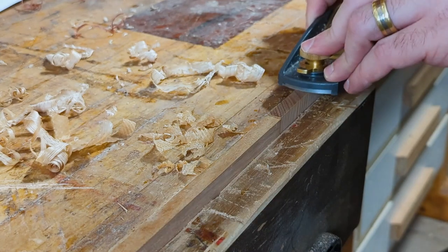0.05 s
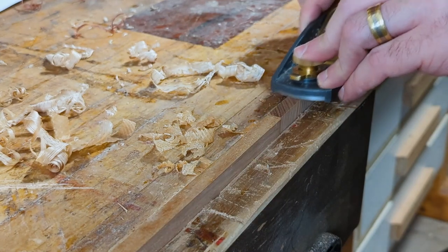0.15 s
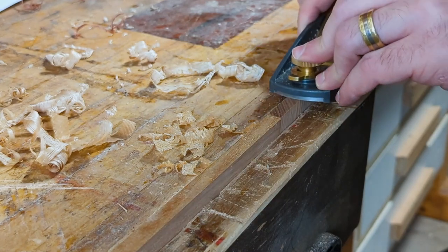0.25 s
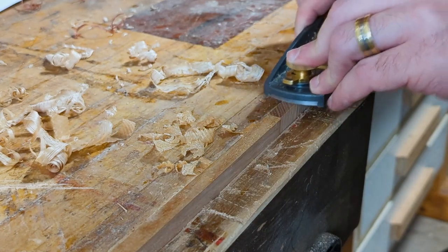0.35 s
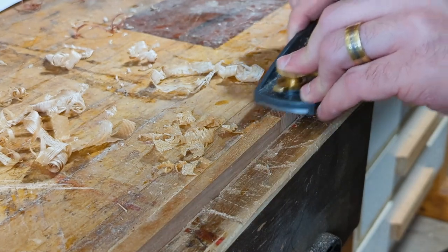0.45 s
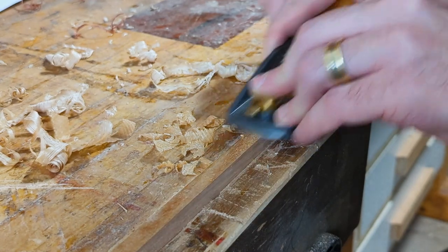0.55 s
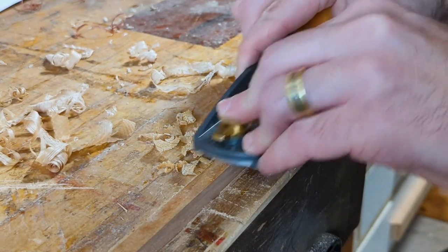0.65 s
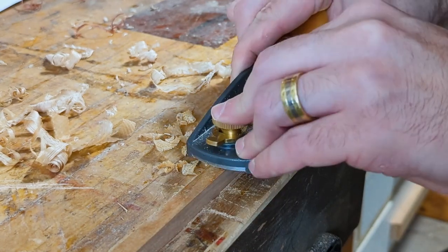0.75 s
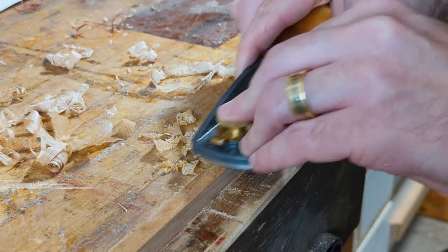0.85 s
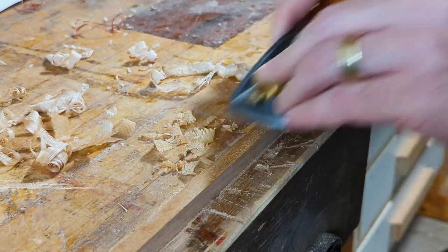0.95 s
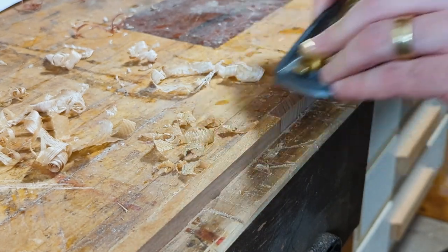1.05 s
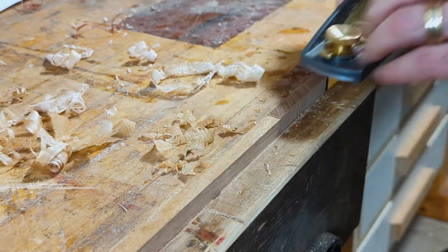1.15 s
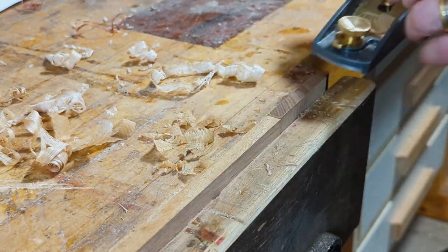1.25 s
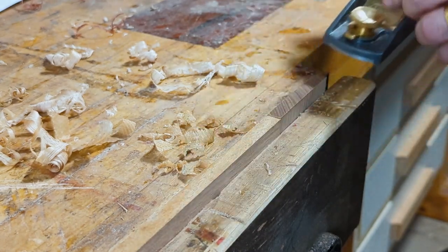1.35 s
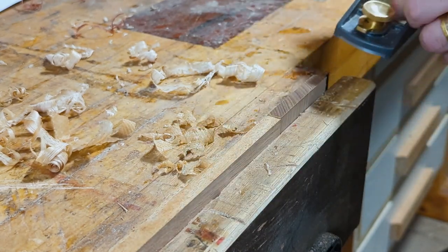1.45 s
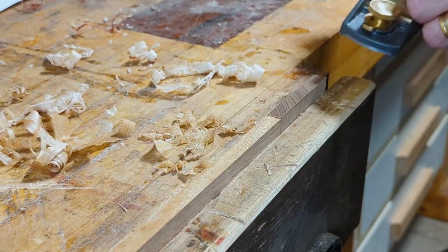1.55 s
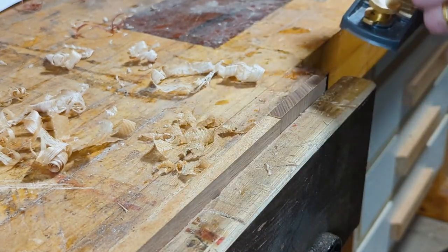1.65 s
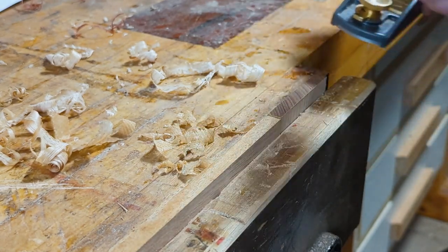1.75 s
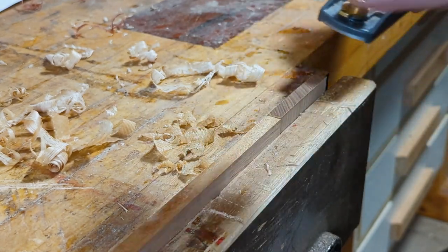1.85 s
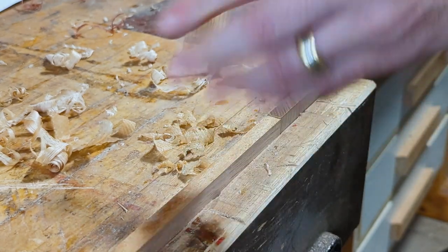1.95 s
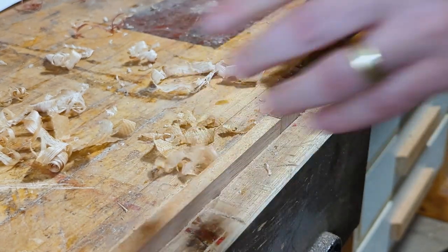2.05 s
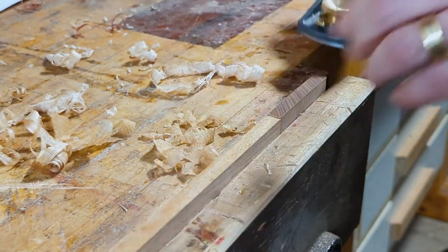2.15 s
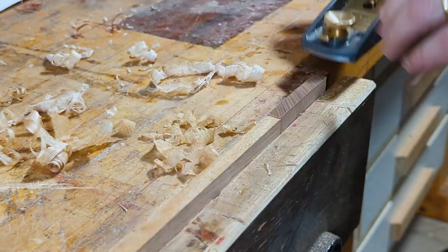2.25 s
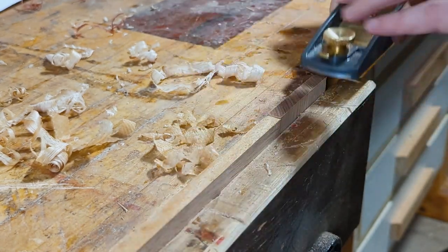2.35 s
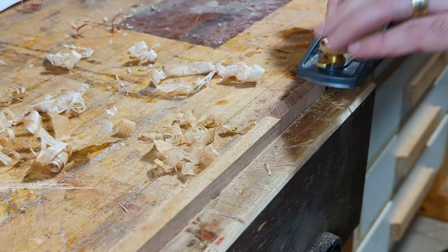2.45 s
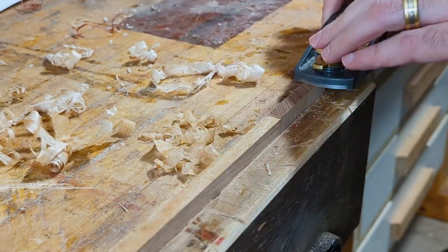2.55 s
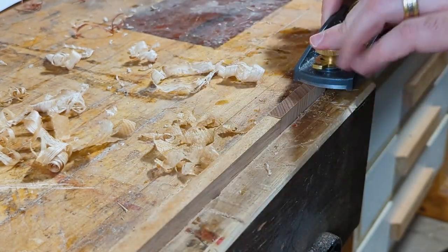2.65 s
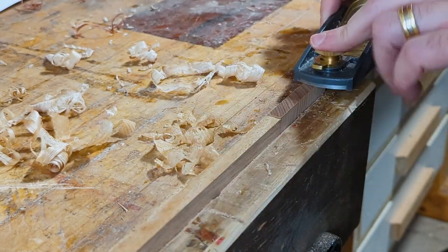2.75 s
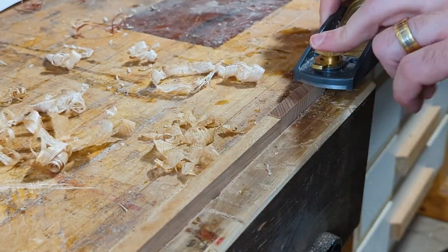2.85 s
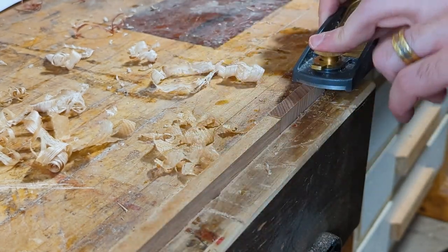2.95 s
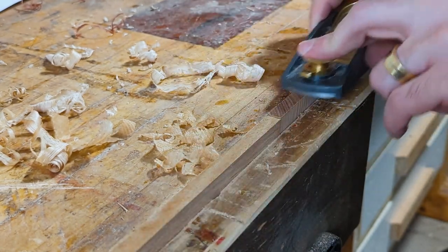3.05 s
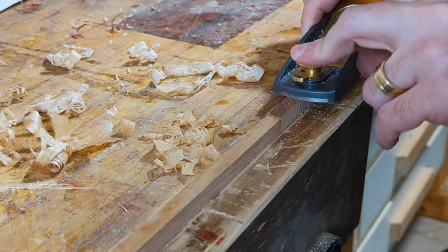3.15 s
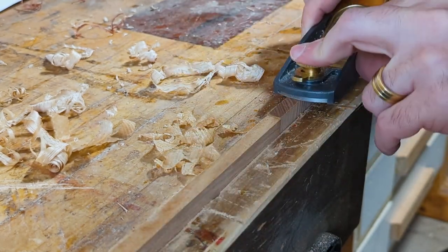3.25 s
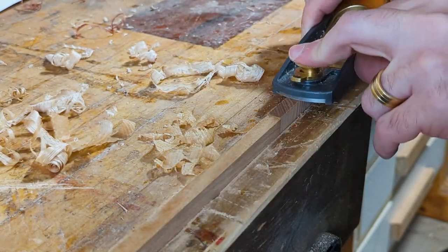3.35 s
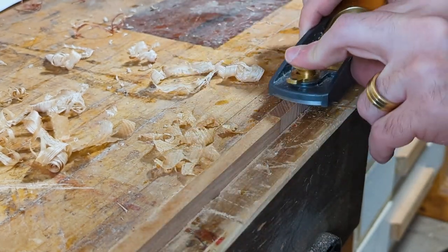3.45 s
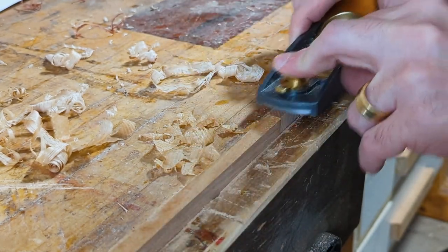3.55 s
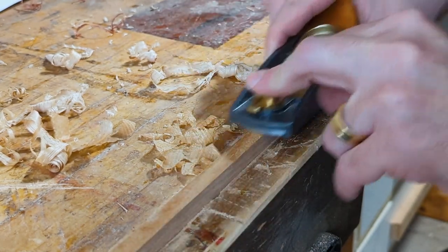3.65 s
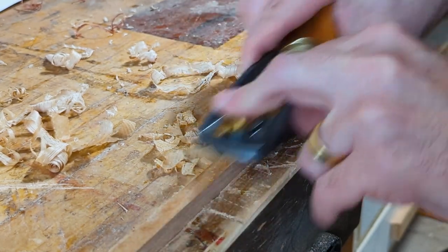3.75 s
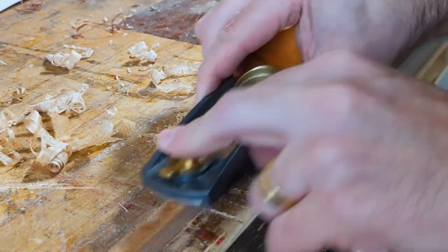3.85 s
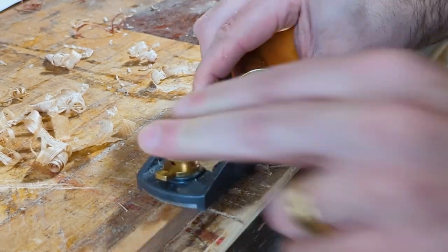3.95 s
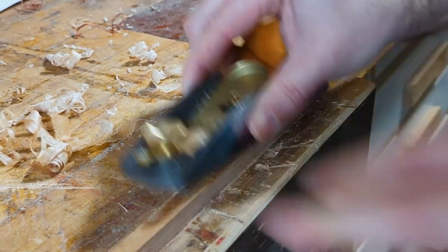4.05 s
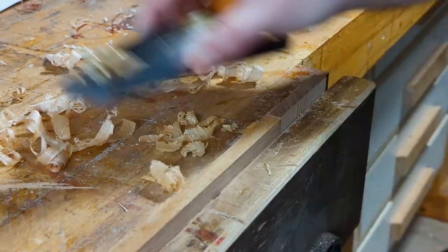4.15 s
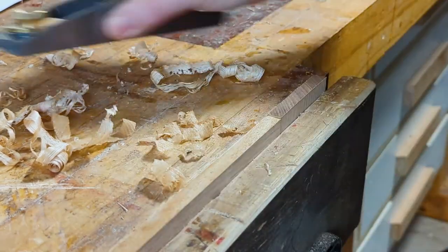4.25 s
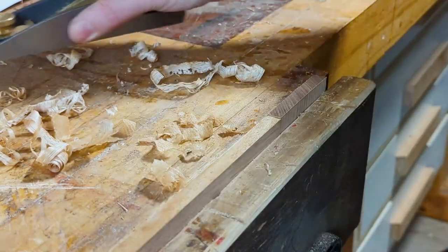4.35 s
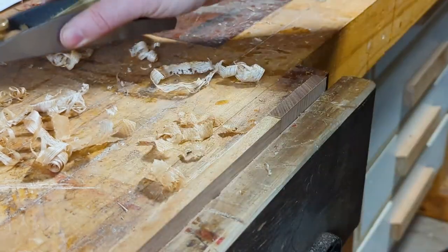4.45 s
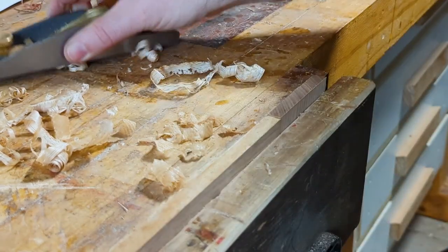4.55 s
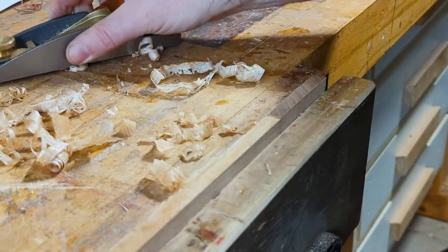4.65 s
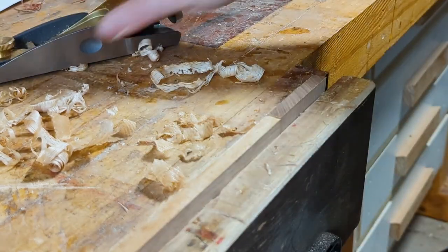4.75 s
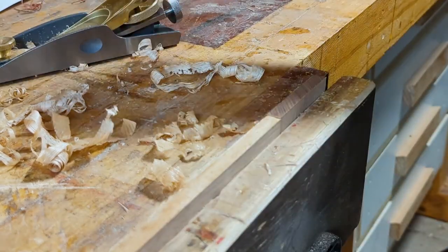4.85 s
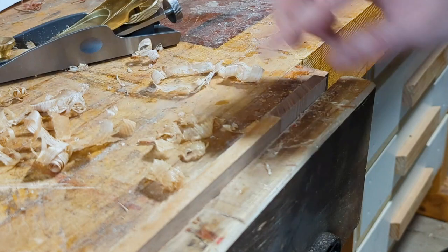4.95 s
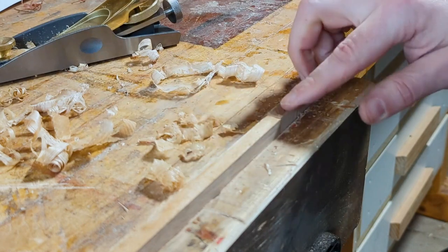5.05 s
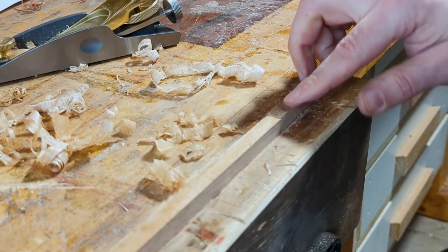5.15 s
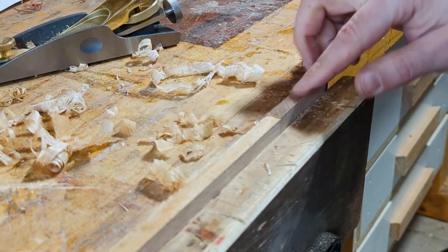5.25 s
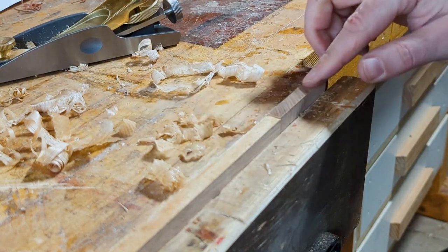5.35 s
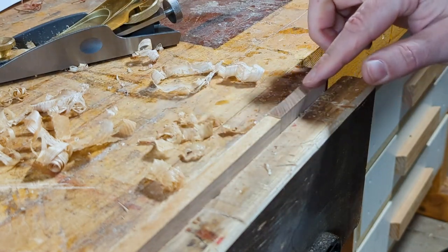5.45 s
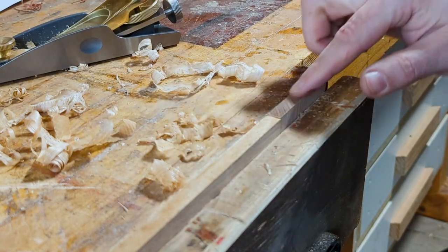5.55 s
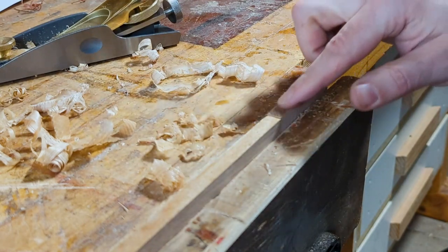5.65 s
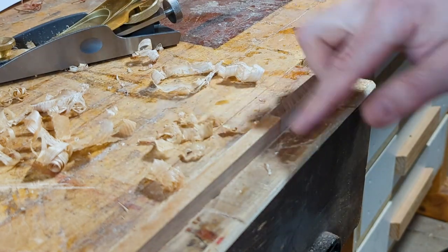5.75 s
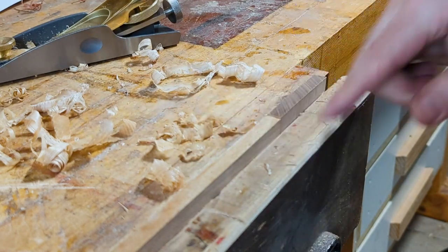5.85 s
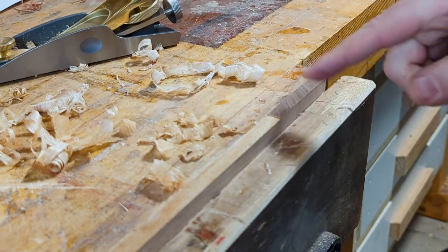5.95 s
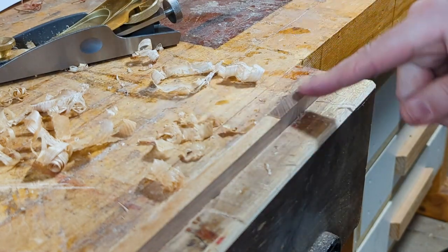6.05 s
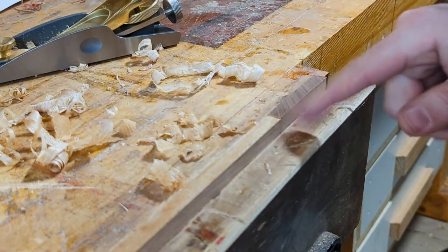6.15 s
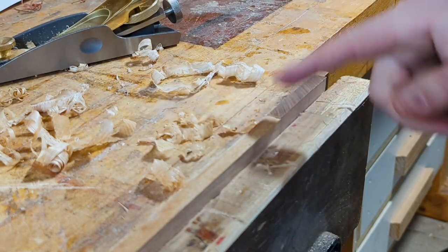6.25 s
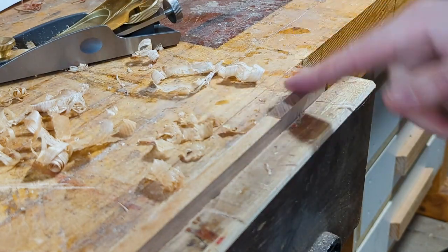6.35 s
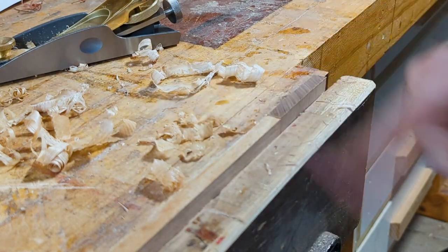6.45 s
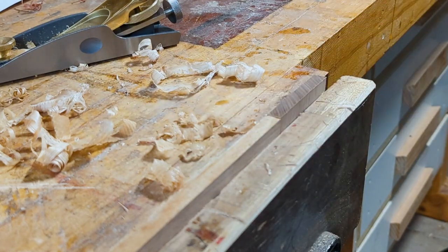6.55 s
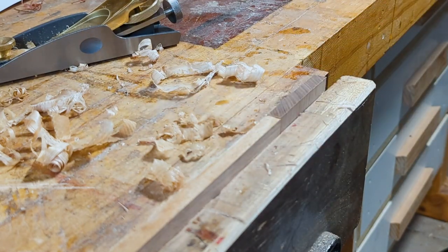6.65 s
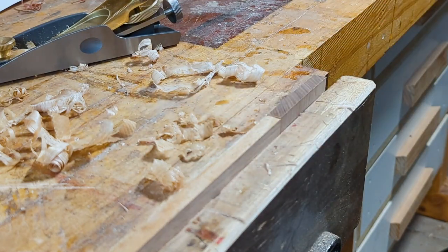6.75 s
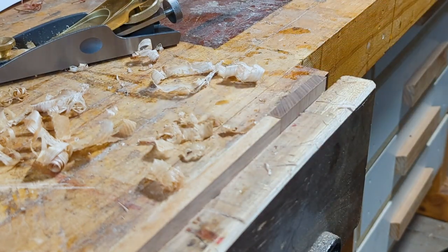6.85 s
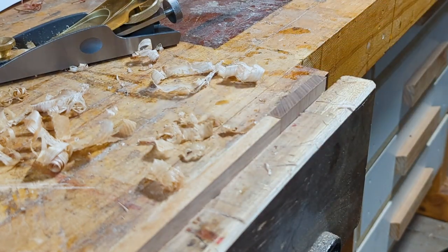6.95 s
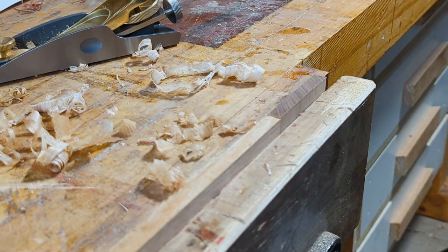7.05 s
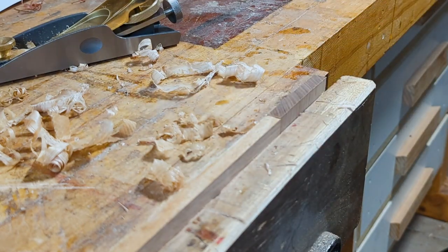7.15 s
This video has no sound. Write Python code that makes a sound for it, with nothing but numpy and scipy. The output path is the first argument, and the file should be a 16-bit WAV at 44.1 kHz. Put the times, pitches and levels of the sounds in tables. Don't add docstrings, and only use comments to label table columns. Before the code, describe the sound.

A hand plane shrieks and scrapes twice over clamped wood, with a soft thud between, then bench knocks and light finger rubbing.

```python
import sys
import numpy as np
from scipy import signal
from scipy.fft import rfft, irfft, next_fast_len
from scipy.io import wavfile
from scipy.ndimage import uniform_filter1d, map_coordinates

SR = 44100
rng = np.random.default_rng(int(sys.argv[2]) if len(sys.argv) > 2 else 0)


def dump(signal):
    limited = np.clip(np.atleast_2d(signal).T, -1, 1)
    pcm = np.round(limited * 32767).astype(np.int16)
    wavfile.write(sys.argv[1], SR, pcm)


def gain_from_db(level_db):
    decades = np.asarray(level_db, float) / 20
    return 10 ** decades


N = 318005
SWELL_DB = 21.5

LOW_GRABS = [(.345, 0.051, 0.018, -12.5), (.374, .013, 0.0081, -16), (.391, 0.0085, 0.011, -14.5),
             (.417, 0.024, 0.019, -17), (.445, .015, 0.018, -29.5)]
GLIDE_GRABS = [(.475, .015, 0.0057, -20.5), (.494, 0.016, 0.01587, -18), (.522, 0.019, 0.021, -21),
               (.546, .012, 0.011, -27.5), (.585, 0.02, 0.028, -27.5)]
HIGH_GRABS = [(.555, 0.033, 0.029, -26), (.59, 0.015, 0.0079, -20.5), (.613, 0.015, .022, -15),
              (.652, 0.034, 0.027, -27), (.72, 0.021, 0.0085, -26.5), (.78, 0.043, 0.05, -31),
              (.84, .04, .035, -38)]
START_GRABS = [(3.097, .01, .005, -19), (3.1015, .006, .008, -5.5), (3.119, .009, 0.0082, -10),
               (3.131, .009, 0.0089, -13), (3.146, .008, 0.0079, -14.5), (3.165, .012, 0.0066, -20),
               (3.181, .011, 0.021, -16), (3.226, .024, 0.016, -19), (3.252, .011, 0.008, -19),
               (3.279, .016, 0.0078, -21.5), (3.303, .013, 0.0052, -19), (3.345, .035, 0.0097, -25.5),
               (3.44, .05, 0.04, -39)]
LAST_GRABS = [(3.598, .022, .01, -9.5), (3.617, .015, .017, -13.5), (3.644, .017, .014, -13),
              (3.66, .01, .011, -15), (3.685, .017, .019, -16), (3.716, .019, .017, -19),
              (3.748, .024, .022, -19), (3.785, .016, .016, -20), (3.82, .016, .016, -30),
              (3.85, .02, .018, -26), (3.88, .014, .02, -27), (3.925, .03, .022, -29)]
# time in seconds, level in dB.
SIDE_LEVEL = [(.63, -37), (0.654, -26.5), (.685, -42), (.71, -29), (.74, -38.5), (.78, -31.5), (.83, -36.5),
              (.868, -41), (.88, -48), (.97, -60)]
# time in seconds, pitch in Hz.
LOW_PITCH = [(0.294, 1880), (0.321, 1818), (0.358, 1827), (.4, 1850), (.45, 1847)]
GLIDE_PITCH = [(.46, 1860), (0.478, 1965), (0.493, 2070), (0.504, 2050), (0.506, 2302), (0.516, 2300),
               (0.518, 2500), (.59, 2510), (.62, 2586)]
HIGH_PITCH = [(0.532, 2715), (0.588, 2800), (.61, 2785), (.9, 2775)]
SIDE_PITCH = [(0.629, 2650), (.95, 2635)]
START_PITCH = [(3.088, 2300), (3.097, 2210), (3.106, 2170), (3.4, 2172), (3.5, 2250)]
LAST_PITCH = [(3.574, 2432), (3.596, 2349), (3.605, 2237), (3.96, 2220)]
# start in seconds, end in seconds, pitch in Hz, first and last level in dB.
SQUEAKS = [(6.201, 6.253, 2234, -72, -58), (6.25, 6.406, 2244, -60, -66), (6.489, 6.65, 2314, -62.5, -66),
           (6.723, 6.85, 2300, -69, -63.5)]
# multiple of the pitch, level in dB.
BRIGHT_OVERTONES = [(2, -15), (3, -20), (4, -25.5), (5, -32), (6, -37), (7, -36.5)]
DULL_OVERTONES = [(2, -15), (3, -24), (4, -31), (5, -42)]


def blade():
    both = np.zeros((2, N))
    squeal(both, LOW_PITCH, grabs(LOW_GRABS), -3, 0.0015, 0.66, settle_s=0.016, dulls_db_s=40)
    squeal(both, GLIDE_PITCH, grabs(GLIDE_GRABS), -29, 0.0042, 1.11)
    squeal(both, HIGH_PITCH, grabs(HIGH_GRABS), -32, 0.0029, 1.46)
    squeal(both, SIDE_PITCH, SIDE_LEVEL, -26, 0.0048, 1.2)
    squeal(both, START_PITCH, grabs(START_GRABS), 3.5, 0.0012, 0.5, settle_s=0.006, half_db=-44,
           overtones=BRIGHT_OVERTONES, dulls_db_s=5.5)
    squeal(both, LAST_PITCH, grabs(LAST_GRABS), -2, 0.0035, 0.5, settle_s=0.0193,
           overtones=DULL_OVERTONES, dulls_db_s=8)
    for s, end, hz, first_db, last_db in SQUEAKS:
        squeal(both, [(s, hz)], [(s, first_db), (end, last_db)], -30, 0.012, 4.5)
    shared, opposed = both
    return heard(shared, -17, lag=0, pan_db=-1) + opposed * [[1], [-1]]


# multiple of the pitch, level in dB.
OVERTONES = [(1, 10), (2, -14.5), (3, -23), (4, -24.5), (5, -29), (6, -40), (7, -40.5)]
HALF_ORDERS = [1.5, 2.5, 3.5]


def squeal(out, pitch, loudness, bite_db, jitter, flutter_db, settle_s=0., half_db=None,
           overtones=OVERTONES[1:], dulls_db_s=0.):
    s, db = np.vstack(loudness).T
    t = np.arange(s[0], s[-1], 1 / SR)

    def chance(rate):
        return wobble(rate, len(t))

    level_db = uniform_filter1d(np.interp(t, s, db), SR // 300)
    hz = np.interp(t, *np.transpose(pitch)) * (1 + jitter * chance(90))
    turn = 2 * np.pi * np.cumsum(hz) / SR
    slow_db = uniform_filter1d(level_db, SR // 40)
    fading_db = 0.2 * (slow_db - slow_db.max())
    bitten_db = slow_db + bite_db - dulls_db_s * (t - s[0])
    orders = list(overtones)
    if half_db:
        orders += [(order, half_db) for order in HALF_ORDERS]

    over = np.zeros(len(t), complex)
    for order, order_db in orders:
        if order * pitch[0][1] < 16700:
            line_db = bitten_db + order_db + order * fading_db + 2.5 * chance(70)
            over += gain_from_db(line_db) * np.exp(1j * (order * turn + 0.8 * chance(150)))
    over *= np.clip((t - s[0] - settle_s) / 0.0039, 0, 1)

    shared = gain_from_db(level_db + flutter_db * chance(60)) * np.sin(turn) + over.imag
    drift = 0.7 * chance(25)
    in_step = (0.3 * chance(35) - 0.1) * np.sin(turn)
    out_of_step = (0.75 + 0.25 * chance(35)) * np.cos(turn + drift)
    opposed = gain_from_db(0.6 * level_db + 0.4 * slow_db) * (in_step + out_of_step)
    opposed += 1.1 * (over * np.exp(1j * drift)).real + 0.15 * over.imag
    edge = np.clip(np.minimum(t - s[0], s[-1] - t) / 0.0031, 0, 1)
    add(out, edge * gain_from_db(1) * np.array([shared, opposed]), s[0])


def grabs(rows):
    s, rise, fall, db = np.transpose(rows)[..., None]
    t = np.arange((s - rise).min(), (s + fall).max(), 0.001)
    phase = np.clip(np.where(t < s, (s - t) / rise, (t - s) / fall), 0, 1)
    power = (gain_from_db(db) * np.cos(np.pi / 2 * phase)) ** 2
    between = gain_from_db(db.max() - 30)
    return np.c_[t, 10 * np.log10(power.sum(0) + between ** 2)]


# centre in Hz, width in Hz, level in dB.
BENCH = [(363, 46, 5), (595, 130, -1), (820, 210, -5.5), (1250, 840, -10.5)]
IRON = [(1454, 57, -14), (1847, 75, -2.5), (1977, 60, -4.5), (2300, 92, -2.5), (2510, 47, -1),
        (2743, 74, -1.5), (3320, 540, -21), (3970, 190, -19.5)]
BOARD = [(1480, 340, -1), (2050, 820, -4), (2650, 190, 3), (3340, 560, -9), (4170, 1800, -14)]
# frequency in Hz, level in dB per Hz.
RASP = [(1880, -34.5), (3200, -3), (3480, -8), (3770, -4.5), (4530, -12), (8820, -5), (10500, -12.5),
        (13600, -35.5), (22000, -120)]
SIZZLE = [(6000, -31), (9500, 1), (11500, -3.5), (14000, -5), (15800, -6)]
CRISP = [(5000, -10), (8000, -9), (10500, -1), (12500, -0.5), (14500, -2.5), (15800, -3.5)]


def rubbing():
    drone_db, ring_db, rasp_db, sizzle_db = contact_levels()
    drone = gain_from_db(drone_db - 4.5) * unit(filtered(grit(2, 4.5, 0.7), body(BENCH)))

    shake = grit(4, 2.5, 0.8)
    put_away = round(4.95 * SR)
    iron = unit(filtered(shake[:, :put_away], body(IRON)))
    board = unit(filtered(shake[:, put_away:], body(BOARD)))
    ring = gain_from_db(ring_db) * np.hstack([iron, board])

    ripple_db = 2.6 * rng.standard_normal(200)
    fibres = filtered(grit(5, 1.3, 0.8), lambda hz: gain_from_db(np.interp(hz / 130, np.arange(200), ripple_db)))
    fibres = patchy(fibres, depth_db=4)
    laid_down = round(4.4 * SR)
    sizzle = np.hstack([coloured(fibres[:, :laid_down], SIZZLE), coloured(fibres[:, laid_down:], CRISP)])
    hiss = gain_from_db(rasp_db + 6) * coloured(fibres, RASP) + gain_from_db(sizzle_db + 2) * sizzle
    return heard(drone + ring, -5.5, lag=9, pan_db=-1) + heard(hiss, -6.5, lag=7, pan_db=3)


# peak in seconds, rise in seconds, fall in seconds, ring level in dB, hiss over ring in dB.
FIRST_STROKE = [(.185, 0.14, .02, -42.5, -13), (.2, 0.0023, 0.066, -33, -26.5),
                (.336, 0.036, 0.58, -50.5, 2.5), (.52, 0.19, 0.14, -26, -19), (.6, .1, 0.15, -44, -2),
                (.7, .1, 0.12, -55, -3.5), (.875, .01, .06, -49, -11.5), (1.93, 0.011, .012, -81, 3.5)]
SECOND_STROKE = [(3.01, .03, .25, -43.5, -20), (3.07, .09, 0.09, -40, -15), (3.128, .012, 0.05, -35, -10),
                 (3.16, .03, .2, -44, -16), (3.385, .005, .08, -55, -24), (3.432, 0.0074, 0.29, -29, -19.5),
                 (3.555, 0.14, .09, -25.5, -15.5), (3.751, 0.36, .2, -36, -9.5),
                 (3.91, .5, 0.044, -51.5, -12), (4.016, 0.0051, .04, -50, -13),
                 (4.072, 0.0054, 0.15, -48.5, -50)]
SHAVINGS = [(4.582, 0.035, 0.13, -56.5, 2), (4.685, .005, 0.11, -61, 1.5), (4.746, 0.08, 0.013, -53.5, -6),
            (4.807, 0.0035, 0.058, -49, -14.5)]
FINGERS = [(5.18, 0.053, 0.37, -59, -38), (5.32, 0.18, 0.062, -49, -15.5), (5.635, 0.035, 0.044, -64, -9),
           (5.68, 0.82, 0.14, -59, -25), (5.77, 0.088, .02, -54.5, -7.5), (6.155, 0.11, 0.079, -54.5, -19),
           (6.3, 0.48, 2.2, -64, -25.5), (6.435, 0.029, 0.11, -45.5, -10.5),
           (6.47, 0.066, .07, -46.5, -13.5), (6.96, 0.2, 0.118, -56.5, -36),
           (7.12, 0.076, 1.53, -54.5, -19)]
SIZZLE_OVER_RASP = [4, -1.5, 5.5, 1]
# peak in seconds, rise in seconds, fall in seconds, drone level in dB.
SHUDDERS = [(.12, .9, .3, -61), (.213, 0.019, 0.07, -27.5), (.53, 0.14, 0.25, -27),
            (.884, 0.0293, 0.044, -31), (3.058, 0.12, 0.035, -50), (3.135, 0.042, 0.48, -44),
            (3.385, 0.0034, 0.044, -45), (3.555, 0.17, 0.17, -32), (3.694, 0.086, 0.1, -25.5),
            (3.76, 0.027, 0.2, -33), (4.016, 0.0062, 0.05, -42), (4.07, 0.04, 0.5, -60),
            (5.12, 0.14, .1, -62), (5.32, 0.14, 0.16, -43.5), (5.65, .9, 0.51, -62),
            (6.47, 0.053, 0.089, -41), (6.96, 0.26, 0.19, -57), (7.15, 0.25, 0.75, -58)]


def contact_levels():
    kinds = [FIRST_STROKE, SECOND_STROKE, SHAVINGS, FINGERS]
    scrapes = np.vstack(kinds)
    tilt_db = np.repeat(SIZZLE_OVER_RASP, [len(kind) for kind in kinds])

    def hiss(over_db, quiet_db):
        rows = np.c_[scrapes[:, :3], scrapes[:, 3] + scrapes[:, 4] + over_db]
        return swells(rows, quiet_db, rises=1.2, falls=1.4, lets_go=1.64)

    drone_db = swells(SHUDDERS, -75.5)
    ring_db = swells(scrapes[:, :4], -81.5)
    return drone_db, ring_db, hiss(-tilt_db / 2, -104), hiss(tilt_db / 2, -106)


def grit(spread_db, clump_db, apart):
    noise = rng.standard_normal(N) + apart * rng.standard_normal((2, N))
    return noise * gain_from_db(spread_db * rng.standard_normal(N) + clump_db * wobble(180))


def patchy(x, depth_db):
    z = signal.stft(x, nperseg=512)[2]
    field = uniform_filter1d(rng.standard_normal(z.shape[1:]), size=5, axis=0)
    field = uniform_filter1d(field, size=9, axis=1)
    return signal.istft(z * gain_from_db(depth_db * unit(field)), nperseg=512)[1][:, :N]


# peak in seconds, rise in seconds, fall in seconds, pitch in Hz, level in dB.
HUMS = [(.12, .09, 0.09, 2750, -44), (.118, .008, .08, 2240, -47), (.185, .09, 0.027, 2720, -35.5),
        (0.874, 0.0073, 0.025, 10000, -46), (.78, 0.097, 0.13, 2720, -41), (0.179, .07, .08, 9700, -56),
        (.49, .1, .06, 9450, -49), (0.886, .012, 0.077, 1680, -44), (0.899, .02, 0.054, 3340, -61),
        (2.99, .03, 0.084, 2240, -47), (3.019, .06, 0.21, 1350, -48.5), (3.04, .09, 0.072, 2600, -45),
        (3.16, .04, 0.19, 1080, -50), (3.394, .012, .06, 1800, -36), (3.53, .12, .1, 8800, -48.5),
        (3.55, .1, .05, 2700, -26.5), (3.65, .06, 0.082, 1840, -40), (3.99, .03, 0.27, 2230, -49),
        (4.07, .03, 0.087, 750, -47.5), (4.695, .012, .03, 12200, -54.5), (5.221, .06, 0.29, 2650, -55.5),
        (5.833, 0.0032, 0.045, 1250, -61), (6.269, .03, 0.066, 2710, -57.5), (3.17, .05, .2, 350, -44),
        (3.71, .1, .2, 355, -34), (3.5, .1, .12, 2760, -33), (6.3, .15, .2, 380, -58),
        (6.45, .03, .06, 10000, -54)]


def hums():
    out = np.zeros((2, N))
    for s, rise, fall, hz, db in HUMS:
        start = max(s - 2 * rise, 0)
        t = np.arange(start, start + 0.7, 1 / SR) - s
        noise = rng.standard_normal(len(t)) + 0.8 * rng.standard_normal((2, len(t)))
        ring = body([(hz, hz / 30, 0)])
        hum = unit(filtered(noise, lambda f: ring(f) ** 2))
        swell = gain_from_db(db - SWELL_DB * np.where(t < 0, -t / rise, t / fall))
        add(out, swell * hum, start)
    return heard(out, -9.5, lag=8)


# time in seconds, crack level in dB, thump over crack in dB, left over right in dB.
KNOCKS = [
    (0.1975, -26.5, -6, -2.5),
    (0.8686, -28.5, -8.5, 3),
    (4.0096, -47, -3, 0),
    (5.0662, -60, 14, -3),
    (5.2984, -45.5, -3, 2),
    (5.3897, -58.5, 5.5, -2.5),
]
LANDING = [
    (2.4445, -37, 9.3, 0.48),
    (2.519, -53.5, 5.9, 0.36),
]
SET_DOWN = [
    (4.595, -24, 4.1, 1.9),
    (4.6024, -29.5, 10.6, 0.73),
]
TICKS = [(1.928, -58.5, -40, 1), (3.1, -34, -30.5, 1.5), (.199, -32, -12, -.5), (.474, -29.5, -15, .5),
         (4.579, -33.5, -41, 2), (4.5991, -26, -43.5, -1.7), (4.6865, -44, -38, 1.5), (5.2, -49, -28, 1.5),
         (4.618, -42, -30, 1.5), (6.4645, -30.5, -40, 0.5)]
# centre in Hz, width in Hz, level in dB.
VICE = [(366, 150, 2), (480, 110, 0.5), (750, 200, -4), (1010, 130, -9), (1530, 570, -14), (2250, 230, -14),
        (2580, 180, -10.5), (3370, 450, -27)]
SOLE = [(360, 107, 1), (640, 180, -2), (886, 170, -4), (1680, 180, -13), (2150, 180, -16), (2610, 150, -14),
        (3300, 400, -20)]
TOP = [(317, 76, -0.5), (500, 250, -1.5), (886, 120, 2.5), (1268, 190, -1.5), (1800, 800, -15),
       (2500, 180, -20), (3580, 1100, -16), (4600, 1000, -23.5)]


def blows():
    return (knocks(KNOCKS, VICE, 0.039, 0.69, top_hz=8990)
            + knocks(LANDING, SOLE, 0.058, 0.5, top_hz=3770)
            + knocks(SET_DOWN, TOP, 0.037, -2.3, top_hz=6040)
            + knocks(TICKS, TOP, 0.016, -0.5, top_hz=14800))


def knocks(contacts, wood, push_s, wet_db, top_hz):
    out = np.zeros((2, N))
    t = np.arange(SR // 2) / SR
    for s, db, thump_db, pan_db in contacts:
        crack = gain_from_db(db + 7.5 - 60 * t / 0.0089) * rng.standard_normal(len(t))
        push = gain_from_db(db + thump_db + 18.5 - 60 * t / push_s) * rng.standard_normal(len(t))
        blow = filtered(crack, lambda f: 1j * f / (3000 + 1j * f)) + filtered(push, body(wood))
        blow = filtered(blow, lambda f: (1 + 1j * f / top_hz) ** -4.)
        add(out, heard(blow, wet_db, lag=8.5, pan_db=pan_db), s)
    return out


# start in seconds, pitch in Hz, peak level in dB, 60 dB decay in seconds.
RINGS = [(.2, 128, -16.5, 0.14), (.2, 495.5, -22.5, 0.095), (.203, 2255, -18, 0.062),
         (2.464, 360.4, -28, 0.26), (4.61, 2568, -25, 0.22), (4.055, 194, -36, 0.15),
         (2.4445, 2600, -34, .06), (2.4445, 2150, -36, .06), (2.45, 1680, -36, .12), (.87, 608, -34, .15),
         (.87, 420, -32, .15), (.2, 2700, -30, .05), (5.07, 340, -42, .1), (4.582, 2446, -17.5, 0.031),
         (4.612, 2107, -26, 0.25)]


def rings():
    x = np.zeros(N)
    t = np.arange(SR // 2) / SR
    for s, hz, db, t60 in RINGS:
        decay = gain_from_db(db - 60 * t / t60 + 3 * wobble(50, len(t)))
        swell = 1 - np.exp(-t * hz / 3)
        add(x, decay * swell * np.sin(2 * np.pi * hz * t), s)
    return heard(x, -11, lag=8, pan_db=-1.5)


# time in seconds, level in dB.
RUMBLE = [(0.0, -50), (1.08, -50), (1.65, -65), (1.74, -54.5), (2.03, -65), (2.51, -48), (2.75, -52),
          (3.25, -44), (3.57, -40.5), (3.61, -54.5), (4.7, -45.5), (6.12, -56.5), (6.45, -47), (6.75, -56),
          (7.21, -53)]
# peak in seconds, rise in seconds, fall in seconds, level in dB.
THUMPS = [
    (.24, 0.061, 0.06, -38.5),
    (3.15, 0.036, 0.051, -38.5),
    (4.08, 0.14, 0.065, -40.5),
    (4.62, 0.069, 0.21, -41),
]
# frequency in Hz, level in dB per Hz.
DRONE = [(15, -91.5), (25, -66.5), (63, -13.5), (107, -4), (129, 1), (188, -5), (213, -6), (231, -24),
         (300, -18.5), (390, -55.5), (660, -120)]
AIR = [(140, -33.5), (230, 0), (322, -16.5), (509, -14.5), (556, -12.5), (764, -18), (1170, -19.5),
       (1520, -21), (1630, -20.5), (1780, -17), (6250, -33), (7200, -38), (15700, -56)]


def shop_air():
    fan_db = np.interp(np.arange(N) / SR, *np.transpose(RUMBLE))
    rumble_db = 10 * np.log10(gain_from_db(fan_db) ** 2 + gain_from_db(swells(THUMPS, -120)) ** 2)
    rumble = coloured(rng.standard_normal(N) + 0.15 * rng.standard_normal((2, N)), DRONE)
    hiss = coloured(0.86 * rng.standard_normal(N) + rng.standard_normal((2, N)), AIR)
    hum = unit(filtered(rng.standard_normal((2, N)), body([(573, 23, 0)])))
    air = gain_from_db(0.5 * (rumble_db + 59.5)) * (gain_from_db(-66) * hiss + gain_from_db(-72.5) * hum)
    return gain_from_db(rumble_db + 1.6 * wobble(7.8)) * rumble + air


# frequency in Hz, 60 dB decay in seconds.
SHOP = [(150, 0.41), (600, 0.38), (2200, .5), (5000, 0.06), (12000, 0.013)]


def heard(x, wet_db, lag, pan_db=0.):
    hz, t, z = signal.stft(rng.standard_normal((2, SR // 2)), SR, nperseg=256)
    apart = np.clip(hz / 700, 0.12, 1)[:, None]
    z = np.array([z[0] + apart * z[1], z[0] - apart * z[1]]) / np.sqrt(1 + apart ** 2)
    tail = signal.istft(z * gain_from_db(-60 * t / along(SHOP, hz)[:, None]), SR, nperseg=256)[1]
    tail = np.pad(tail / np.linalg.norm(tail[0]), ((0, 0), (SR // 300, 0)))
    sides = np.array([[0.5], [-0.5]])
    direct = filtered(x, lambda f: np.exp(2j * np.pi * f / SR * lag * sides))
    echo = signal.fftconvolve(np.atleast_2d(x), tail, axes=1)[:, :x.shape[-1]]
    return gain_from_db(pan_db * sides) * (direct + gain_from_db(wet_db) * echo)


# time in seconds, depth in dB, recovery in seconds.
DUCKS = [
    (3.103, 8, .02),
    (3.598, 5.5, 0.071),
]


def ducking():
    t = np.arange(N) / SR
    depth_db = sum(db * (t > s) * np.exp(-np.abs(t - s) / back) for s, db, back in DUCKS)
    return gain_from_db(-uniform_filter1d(depth_db, SR // 300))


def swells(rows, quiet_db, rises=1, falls=1, lets_go=1):
    s, rise, fall, db = np.transpose(rows)[..., None]
    t = np.arange(0, N / SR, 0.001)
    down = np.where(t < s, rises * (s - t) / rise, falls * np.abs((t - s) / fall) ** lets_go)
    power = gain_from_db(db - SWELL_DB * np.minimum(down, 10)) ** 2
    return np.interp(np.arange(N) / SR, t, 10 * np.log10(power.sum(0) + gain_from_db(quiet_db) ** 2))


def body(modes):
    def response(f):
        total = 0
        for k, (centre, width, db) in enumerate(modes):
            damping = 1j * f * width
            total = total + (-1) ** k * gain_from_db(db) * damping / (centre ** 2 - f ** 2 + damping)
        return total
    return response


def filtered(x, response):
    size = x.shape[-1]
    m = next_fast_len(size + SR // 8)
    return irfft(rfft(x, m) * response(np.fft.rfftfreq(m, 1 / SR)), m)[..., :size]


def coloured(x, spectrum):
    return unit(filtered(x, lambda hz: gain_from_db(along(spectrum, hz))))


def along(points, hz):
    f, v = np.transpose(points)
    return np.interp(np.log(hz + 1), np.log(f + 1), v)


def unit(x):
    return x / np.sqrt(np.mean(x ** 2) + 1e-20)


def wobble(rate, size=N):
    knots = rng.standard_normal(size // 40 + 4)
    return map_coordinates(knots, [np.arange(size) * min(rate, 900) / SR])


def add(out, x, s):
    at = out[..., round(s * SR):][..., :x.shape[-1]]
    at += x[..., :at.shape[-1]]


def scene():
    quieter = (rubbing() + hums() + shop_air()) * ducking()
    return blade() + quieter + blows() + rings()


def low_pass(x):
    return signal.sosfilt(signal.butter(12, 15810, fs=SR, output="sos"), x)


def record(dry):
    mix = filtered(dry, lambda f: (f < 15800) * (1j * f / (40 + 1j * f)) ** 2)
    return low_pass(mix)


dry = scene()
out = record(dry)
dump(out)
```